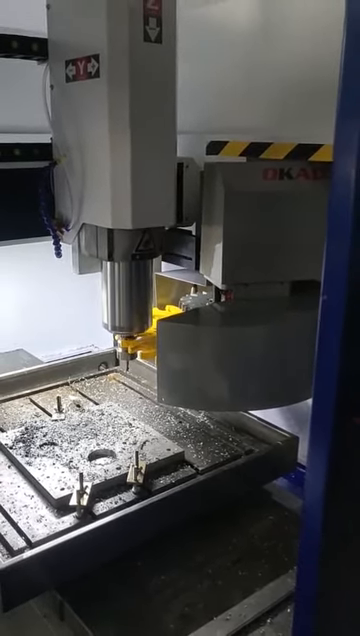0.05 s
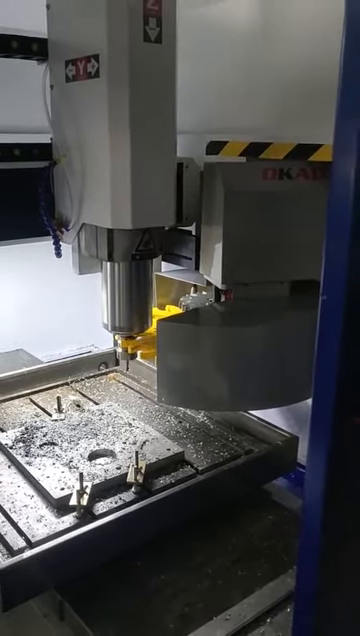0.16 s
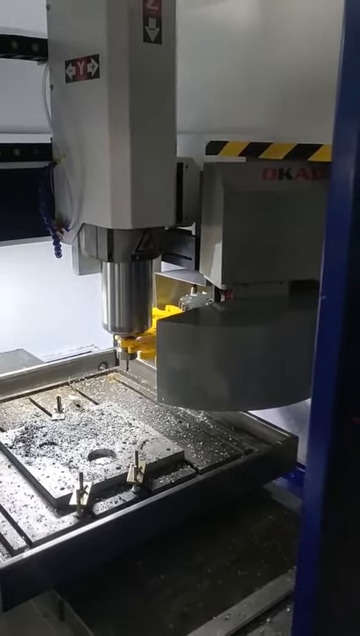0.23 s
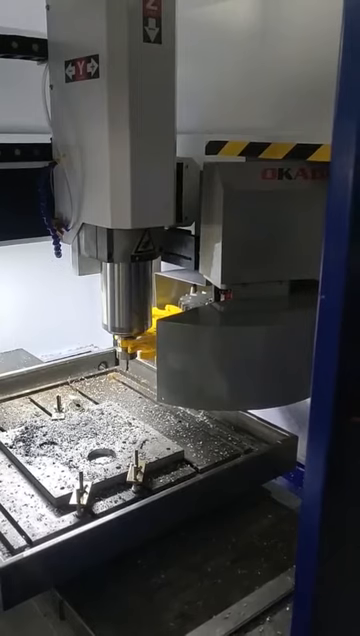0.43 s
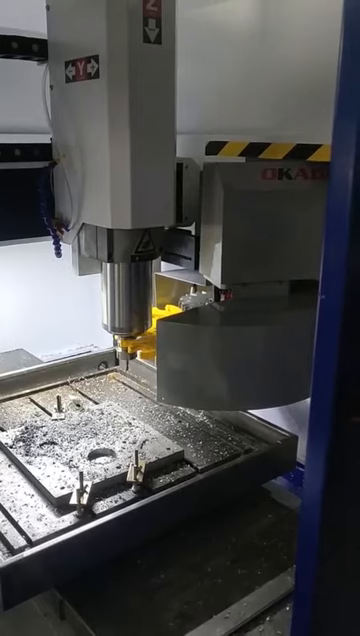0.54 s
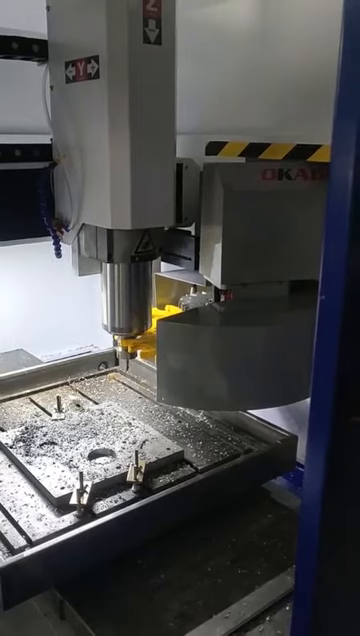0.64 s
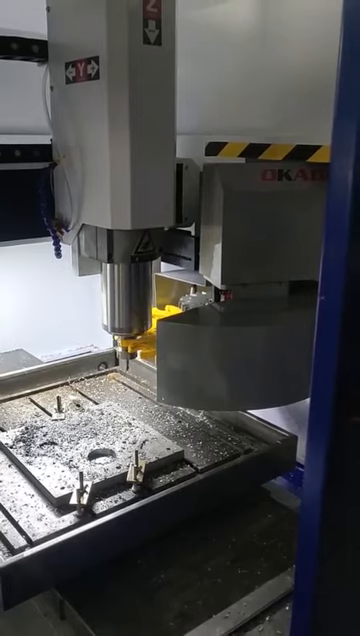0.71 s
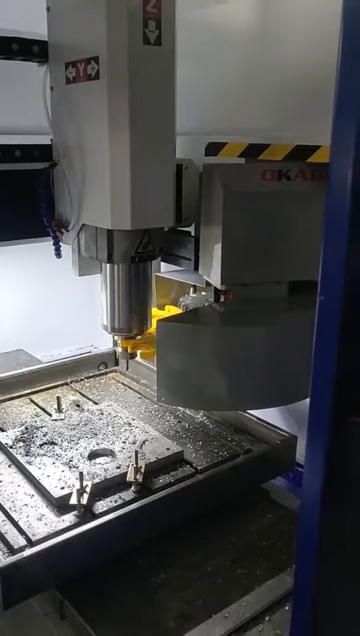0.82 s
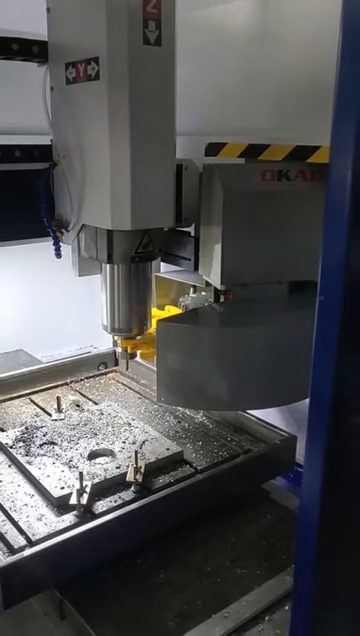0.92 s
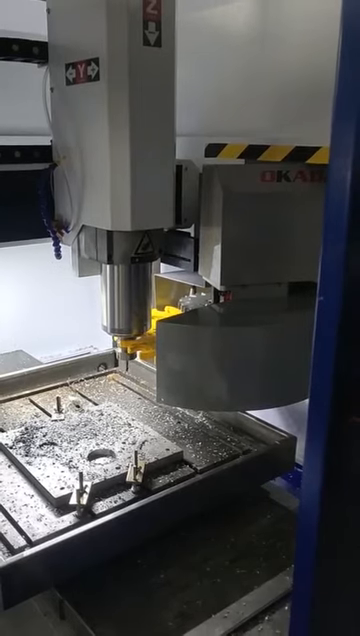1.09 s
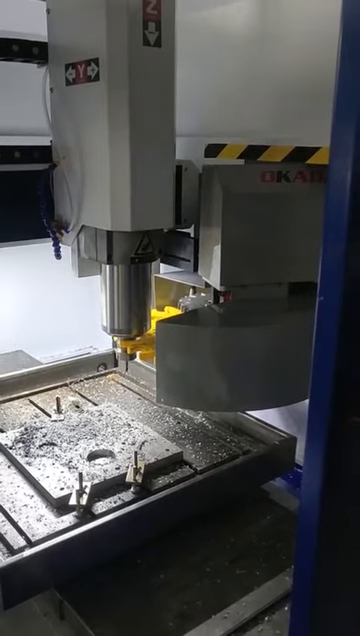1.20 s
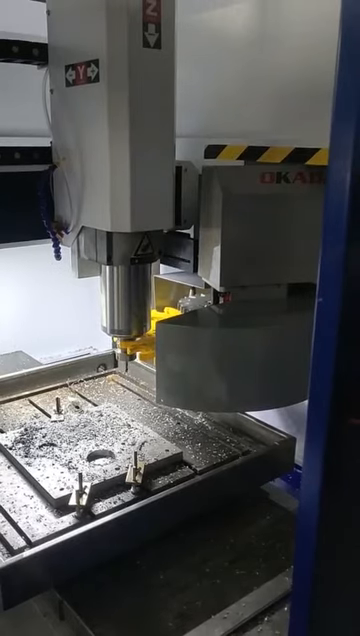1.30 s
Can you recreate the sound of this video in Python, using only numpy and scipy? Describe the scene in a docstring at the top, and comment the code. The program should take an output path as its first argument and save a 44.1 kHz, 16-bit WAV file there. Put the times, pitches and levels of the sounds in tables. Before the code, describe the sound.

Compressed air blasts once from a humming milling machine, with faint metal clinks afterwards.

```python
"""A milling machine hums and whines throughout, mostly on the left. At 0.24 s a valve dumps compressed air:
its body thumps in damped modes, and the first rush gives a hollow bark and a short whistle. The turbulent
jet hisses brightly, drives the metal around the outlet into resonance and fades as the line empties; a thin
hiss through the closing gap outlasts it. A deep drone dies down after the blast, faint clinks and knocks
come from the workshop, and near the end the drone recovers a little as a motor hum comes up."""
import sys
import numpy as np
from scipy import signal
from scipy.fft import rfft, irfft
from scipy.io import wavfile
from scipy.ndimage import uniform_filter1d

SR = 44100
rng = np.random.default_rng(int(sys.argv[2]) if len(sys.argv) > 2 else 0)


def unload_wav(signal):
    """Save mono or channel-first audio to the path in sys.argv[1] as 16-bit WAV at rate SR, clipped to [-1, 1]."""
    wavfile.write(
        sys.argv[1],
        SR,
        np.round(np.clip(np.atleast_2d(signal).T, -1, 1) * 32767).astype(np.int16),
    )


N = 59535
TIME = np.arange(N) / SR
FREQS = np.maximum(np.fft.rfftfreq(N, 1 / SR), 1)
OPEN_S = 0.236   # the valve opens


def air_jet(rise_s=0.015, nearly_empty_s=OPEN_S + .32):
    """Turbulent mixing radiates broadband noise that falls with the pressure in the line."""
    # spectra of the open jet and of the closing gap: f/Hz, relative spectral level/dB
    jet_spectrum = [(35, -26), (70, -7), (150, -16), (240, -19.5), (420, -11), (520, -12.5), (620, -42),
                    (720, -17), (850, -18), (1050, -15), (1300, -14), (1800, -11), (2400, -8.5), (3400, -5),
                    (4300, -8), (5200, -10.5), (6500, -14), (8200, -12.5), (9700, -9.5), (11500, -11.5),
                    (13500, -15.5), (15400, -16)]
    gap_spectrum = [(5000, -37), (8500, -23), (9700, 4), (10500, -6), (11300, -4.5), (13500, -17),
                    (16000, -27)]
    # direction of the jet: f/Hz, left minus right level/dB
    balance = [(100, 10), (700, 7.5), (2400, 9.5), (3400, 10), (5000, 4), (7800, -1), (9000, 8),
               (10500, 18), (15000, 16)]
    flow = envelope(OPEN_S, rise_s, hold_s=0.099, fall_db_per_s=83.5)
    flow *= decay(nearly_empty_s, fall_db_per_s=81.5)
    flow *= from_db(0.16 * drift(32))   # slight flutter
    lead_s = 0.0162   # the seal leaks just before it opens
    leak = envelope(OPEN_S - lead_s, lead_s, 0.036, 263) ** 2
    hiss = noise(from_db(over_hz(jet_spectrum)), over_hz(balance))
    hiss *= from_db(-24.5) * flow + from_db(-37.5) * leak
    thin_hiss = from_db(-52.5) * noise(from_db(over_hz(gap_spectrum)), over_hz(balance))
    thin_hiss *= envelope(OPEN_S, rise_s, hold_s=0.37, fall_db_per_s=193.5)
    ringing = outlet_ringing() * flow
    return dulled(housing(hiss) + ringing) + housing(thin_hiss)


def outlet_ringing():
    """Forced vibration: the jet excites narrow resonances of the outlet and the metal around it."""
    # resonances: f/Hz, half-width/Hz, relative level/dB
    modes = [(2347, 10, -5), (2457, 13, -2), (2690, 14, -7), (2847, 15, -2), (3360, 15, -3), (3410, 18, -7),
             (3483, 18, -7), (3699, 16, -7), (3831, 16, -7), (3949, 16, -4), (4098, 10, -8), (4372, 16, -9),
             (4807, 11, -6), (6918, 14, -9), (9136, 16, -10), (9585, 18, -6), (12592, 12, -11),
             (13202, 12, -15)]
    return sum(from_db(db - 41.5) * resonance(hz, width, pan_db=13) for hz, width, db in modes)


def dulled(x, corner_hz=11900):
    """As the pressure drops, the highest frequencies of a jet decay fastest."""
    treble = irfft(rfft(x) / (1 + (corner_hz / FREQS) ** 10), N)
    return x - treble + treble * decay(OPEN_S + 0.14, fall_db_per_s=56)


def housing(x, longest_delay_s=.022):
    """Comb filtering: reflections off sheet-metal panels interfere with the direct sound."""
    delays = rng.uniform(.05, 1, (2, 12, 1)) * longest_delay_s   # twelve paths to each ear
    echoes = from_db(-13.5) * np.exp(-2j * np.pi * FREQS * delays).sum(axis=1)
    response = 1 + echoes * FREQS / (FREQS - 1500j)   # echoes are weak below 1500 Hz
    return irfft(rfft(x) * response / np.sqrt(np.mean(abs(response) ** 2)), N)


def valve_thump():
    """Impact excitation: the opening sets the valve body into damped free vibration."""
    # modes of the valve body: f/Hz, relative level/dB, T60/s
    modes = [(72, -3, 0.077), (150.3, -3, 0.018), (343, -2, 0.052), (540, -7.5, 0.018), (776, -2, .11),
             (1253, -8, 0.068)]
    return from_db(-30) * struck(.2348, modes) * pan(6)


def bark():
    """The first rush of air is a noise transient; broad spectral peaks make it sound hollow."""
    # spectrum of the rush: f/Hz, relative spectral level/dB
    spectrum = [(30, -32.5), (50, -20), (70, -12), (130, -12.5), (340, 3), (480, -8), (620, -13),
                (780, 4.5), (1000, -4), (1350, -4), (1900, -9), (2600, 6), (3400, -4), (4500, -41.5),
                (9000, -44.5), (16000, -40)]
    burst = envelope(.2328, rise_s=0.0044, hold_s=0.0057, fall_db_per_s=213.5)
    return from_db(-23.5) * noise(from_db(over_hz(spectrum)), pan_db=7.5) * burst


def whistle(hz=3360, jitter_hz=8):
    """A brief aerodynamic tone at full pressure, with slight random frequency modulation."""
    phase = 2 * np.pi * np.cumsum(hz + jitter_hz * drift(100)) / SR
    tone = np.array([np.sin(phase), np.cos(phase)]) * pan(15)
    return from_db(-27) * tone * envelope(OPEN_S, rise_s=0.019, hold_s=0.019, fall_db_per_s=221)


def machine_hum(waver_db=1.5):
    """Running machinery radiates a continuous spectrum with wavering motor and pump tones on top."""
    # rumble: f/Hz, relative spectral level/dB
    spectrum = [(30, -15), (55, -6.5), (85, -10.5), (115, -5), (185, 0.5), (250, -2), (280, -14.5),
                (370, -15.5), (430, -10.5), (520, -9.5), (650, -23), (780, -20), (930, -13), (1130, -23.5),
                (1400, -33.5), (1600, -21.5), (1900, -30), (2400, -28), (3200, -30.5), (4200, -31),
                (4600, -42), (5200, -34.5), (6200, -44), (9600, -43), (12000, -50), (15000, -65)]
    # direction of the rumble: f/Hz, left minus right level/dB
    balance = [(60, 2), (350, 15), (900, 9), (1350, 4), (2000, 7), (4200, 10.5), (7500, -1), (11000, 20)]
    # motor and pump tones: f/Hz, half-width/Hz, level/dB, left minus right level/dB
    tones = [(115, 16, -70.5, 7), (198.3, 3.4, -58.5, -1), (232.5, 23, -57.5, 9), (368.8, 3.2, -66.5, 12.5),
             (527, 3.7, -64.5, 2.5), (2851, 45, -64, 26.5), (4300, 37, -84.5, 3)]
    hum = from_db(-50) * noise(from_db(over_hz(spectrum)), over_hz(balance))
    for hz, width, db, pan_db in tones:
        hum += from_db(db + waver_db * drift(2.7)) * resonance(hz, width, pan_db)
    return hum


def drive_whirr():
    """The drive whirrs in narrow noise bands, modulated in amplitude and frequency."""
    # bands: f/Hz, half-width/Hz, relative level/dB, left minus right level/dB
    bands = [(924, 60, -1.5, 14.5), (1309, 39, 2.5, 27), (1409, 61, 0.5, 28), (1535, 22, -1.5, 11)]
    # swells of the whirr: t/s, level/dB
    swells = [(0, -60), (.08, -72), (.14, -59), (.22, -59.5), (.55, -59), (.7, -66), (.86, -60.5),
              (.94, -66), (1.03, -61), (1.12, -71), (1.23, -68.5), (1.35, -78)]
    whirr = sum(from_db(db) * wandering(resonance(hz, width, pan_db)) for hz, width, db, pan_db in bands)
    return whirr * level(swells)


def drone(hz=146.7, width_hz=24.3, pan_db=6.5):
    """Two harmonically related noise bands are heard as one deep pitch."""
    # fade and partial recovery: t/s, level/dB
    contour = [(0, -45), (.1, -43.5), (.22, -41.5), (.4, -48), (.6, -55), (.8, -62.5), (1.35, -55.5)]
    fundamental = resonance(hz, width_hz, pan_db)
    octave = from_db(-8.5) * resonance(2 * hz, 2 * width_hz, pan_db)
    return (fundamental + octave) * level(contour)


def late_motor(hz=494.4):
    """Periodic vibration of a motor gives a pure tone, which comes up near the end."""
    swell = envelope(1.12, rise_s=0.18, hold_s=0, fall_db_per_s=0)
    return from_db(-58.5) * np.sin(2 * np.pi * hz * TIME) * swell * pan(6.5)


def knocks():
    """Heavy damping means wide bandwidth: dull workshop knocks are short bursts of band noise."""
    # knocks: t/s, f/Hz, half-width/Hz, level/dB
    blows = [(0, 740, 165, -52.5), (1.068, 675, 177, -57.5)]
    sound = np.zeros((2, N))
    for start, hz, width, db in blows:
        band = noise(1 / (1 + ((FREQS - hz) / width) ** 4), pan_db=9)
        sound += from_db(db) * band * envelope(start, rise_s=0.0052, hold_s=.035, fall_db_per_s=259)
    return sound


def clinks(chip_count=14, low_hz=2200, high_hz=5000):
    """Small metal pieces and randomly settling swarf ring in inharmonic modes."""
    # impacts of the pieces: t/s, f/Hz, level/dB
    pieces = [(0.701, 2320, -53), (0.732, 3900, -60.5), (.94, 4090, -66), (.99, 4200, -65.5),
              (1.003, 2230, -62), (1.151, 4270, -51.5), (1.179, 4290, -61), (1.221, 4100, -62.5),
              (1.247, 4350, -69.5)]
    # modes of one piece: frequency ratio, relative level/dB, T60/s
    modes = [(0.999, 4, 0.07), (1.013, -17.5, .08), (1.162, -10, 0.093)]
    chips = [(when * N / SR, low_hz * (high_hz / low_hz) ** pitch, -72.5 + 10 * strength)
             for when, pitch, strength in rng.random((chip_count, 3))]
    ringing = sum(from_db(db) * struck(start, np.array(modes) * [hz, 1, 1])
                  for start, hz, db in list(pieces) + chips)
    return ringing * pan(14.5)


def struck(start_s, modes, contact_s=0.0023):
    """Modal superposition: damped sinusoids build up over the contact time of a soft blow."""
    age = np.maximum(TIME - start_s, 0)
    onset = 1 - np.exp(-(age / contact_s) ** 2)
    return onset * sum(from_db(db - 60 * age / t60) * np.sin(2 * np.pi * hz * age)
                       for hz, db, t60 in modes)


def resonance(hz, width_hz, pan_db):
    """A randomly driven resonator gives narrow-band noise; slow swells are evened out, rms 1."""
    band = noise(1 / (1 + ((FREQS - hz) / width_hz) ** 2), pan_db)
    local_power = uniform_filter1d(np.mean(band ** 2, axis=0), size=3000)
    return rms_one(band / np.sqrt(local_power))


def noise(gain, pan_db):
    """Random phases under a given spectrum make stereo noise of rms 1, coherent only at low pitch."""
    # likeness of the two ears: f/Hz, interaural coherence
    likeness = [(60, 1), (150, 1), (300, 0.69), (640, 0.55), (1400, 0), (15000, 0)]
    coherence = np.clip(over_hz(likeness), 0, 1)
    mid, side = np.exp(2j * np.pi * rng.random((2, len(FREQS))))
    ears = np.sqrt(1 + coherence) * mid + np.sqrt(1 - coherence) * side * [[1], [-1]]
    return rms_one(irfft(ears * gain * pan(pan_db), N))


def wandering(x, depth=.022, rate_hz=3.956):
    """Frequency modulation: reading a sound faster and slower makes its pitch drift."""
    position = np.cumsum(1 + depth * drift(rate_hz))
    return np.array([np.interp(position, np.arange(N), ear, period=N) for ear in x])


def drift(rate_hz):
    """Low-pass filtered noise: a slow random fluctuation of rms 1."""
    return rms_one(irfft(rfft(rng.standard_normal(N)) / (1 + (FREQS / rate_hz) ** 2), N))


def envelope(start_s, rise_s, hold_s, fall_db_per_s):
    """Linear attack, then exponential decay beginning hold_s after the start."""
    return np.clip((TIME - start_s) / rise_s, 0, 1) * decay(start_s + hold_s, fall_db_per_s)


def decay(start_s, fall_db_per_s):
    """Exponential decay: from start_s on, equal times lose equal decibels."""
    return from_db(-fall_db_per_s * np.maximum(TIME - start_s, 0))


def level(points):
    """Amplitude over time, interpolated from rows of t/s, level/dB."""
    return from_db(np.interp(TIME, *np.transpose(points)))


def over_hz(points):
    """Interpolation along the logarithmic frequency axis."""
    hz, value = np.transpose(points)
    return np.interp(np.log(FREQS), np.log(hz), value)


def pan(db):
    """Interaural level difference at constant power; positive is to the left."""
    gains = from_db(np.array([[.5], [-.5]]) * db)
    return gains / np.sqrt(np.mean(gains ** 2, axis=0))


def from_db(db):
    """Amplitude ratio for a level in decibels."""
    return 10 ** (np.asarray(db) / 20)


def rms_one(x):
    """Normalisation to unit mean power."""
    return x / np.sqrt(np.mean(x ** 2) + 1e-20)


def scene():
    """Linear superposition of the blast, the running machine and the workshop."""
    blast = valve_thump() + bark() + whistle() + air_jet()
    machine = machine_hum() + drive_whirr() + drone() + late_motor()
    return blast + machine + knocks() + clinks()


def record(dry, cutoff_hz=15700):
    """Band limiting by a steep elliptic low-pass filter."""
    return signal.sosfilt(signal.ellip(12, .1, 85, cutoff_hz, fs=SR, output="sos"), dry)


dry = scene()
out = record(dry)
unload_wav(out)
```